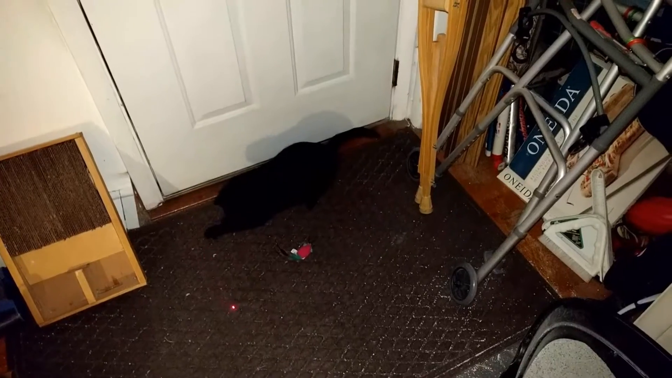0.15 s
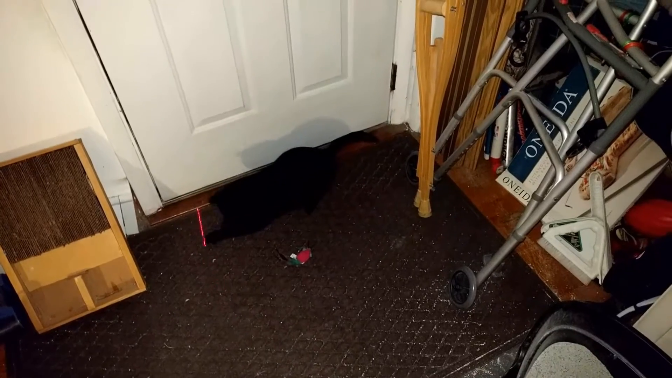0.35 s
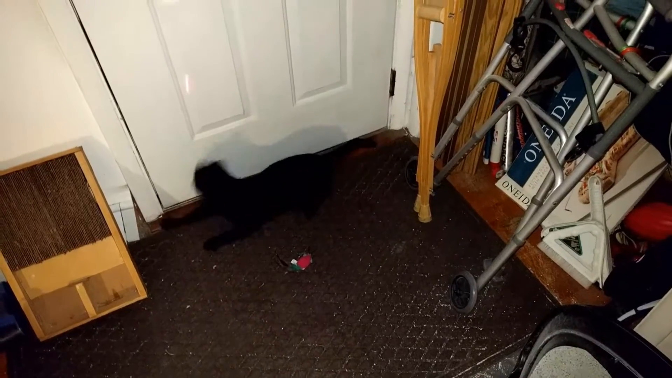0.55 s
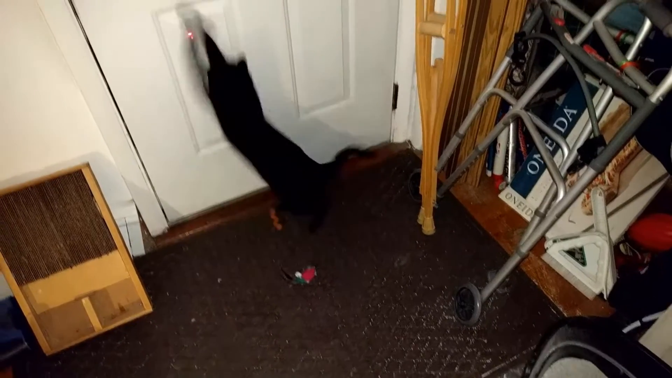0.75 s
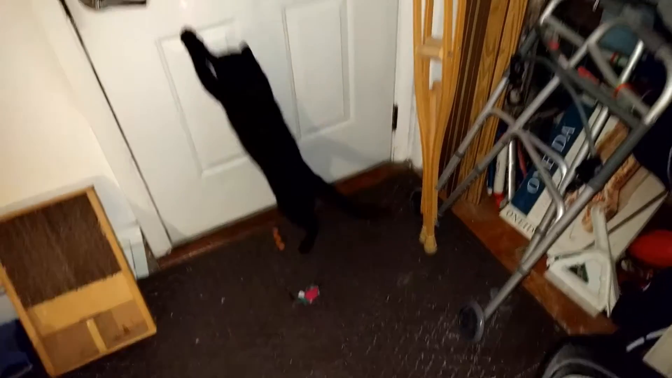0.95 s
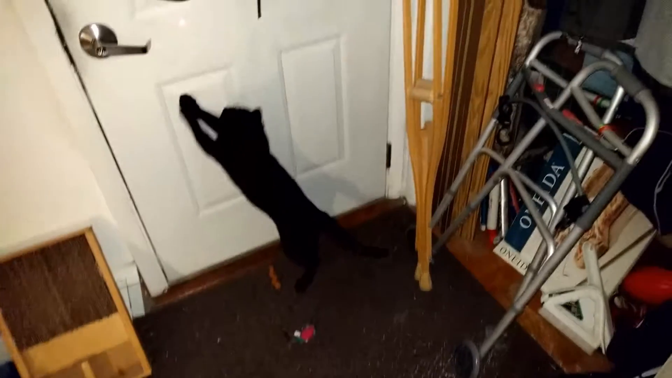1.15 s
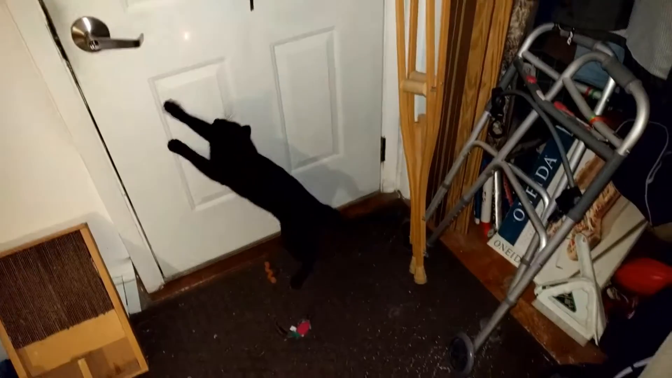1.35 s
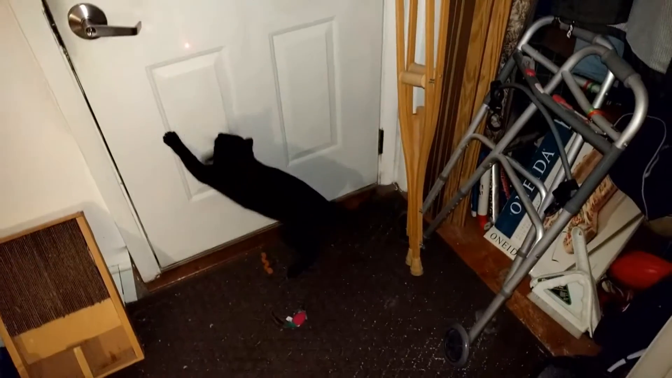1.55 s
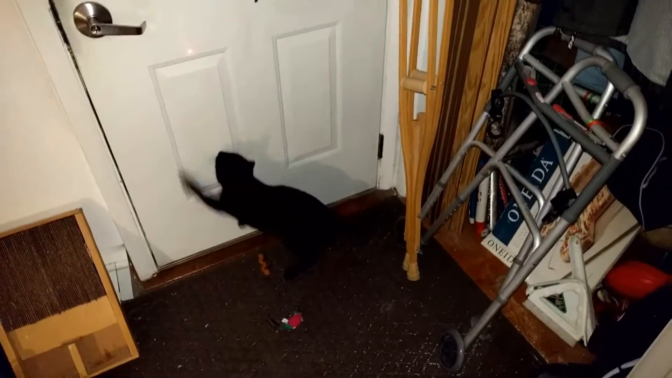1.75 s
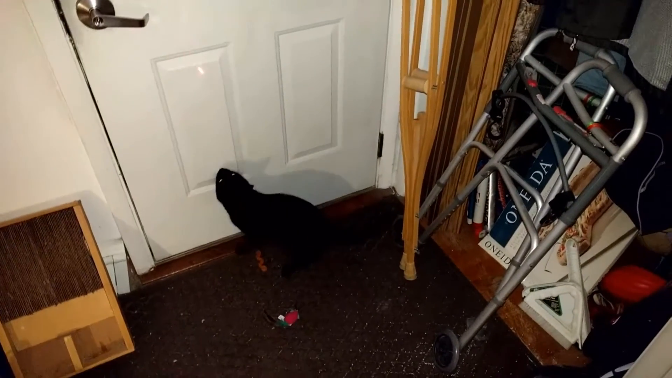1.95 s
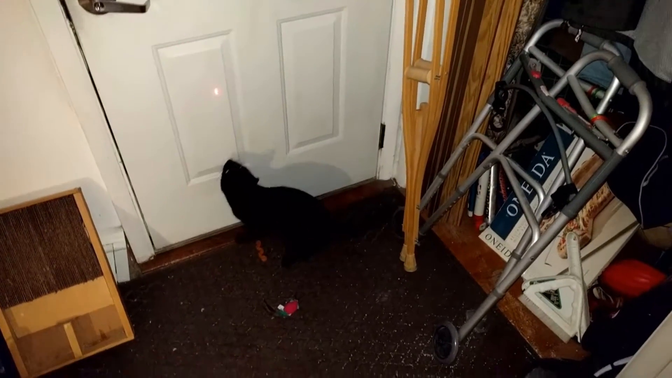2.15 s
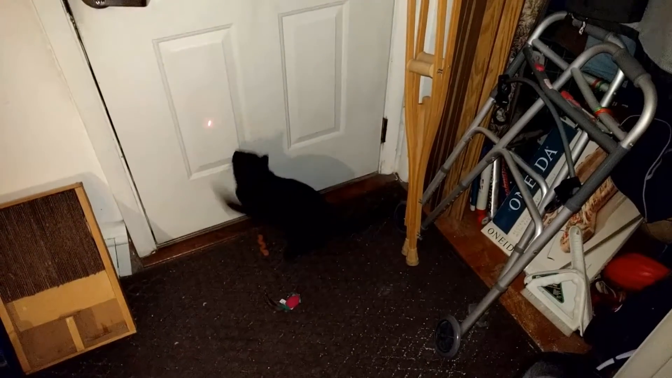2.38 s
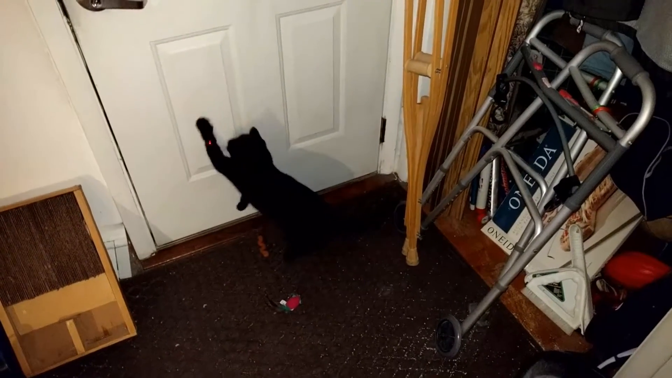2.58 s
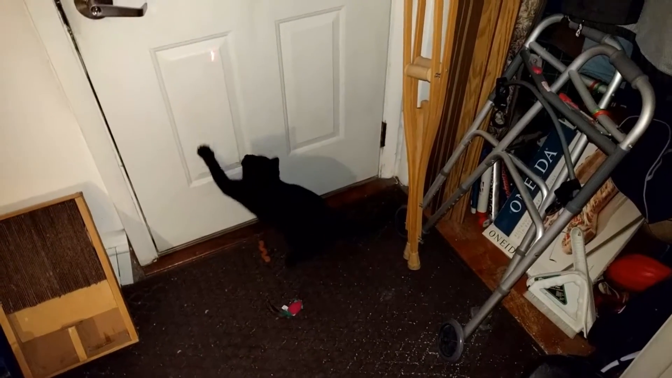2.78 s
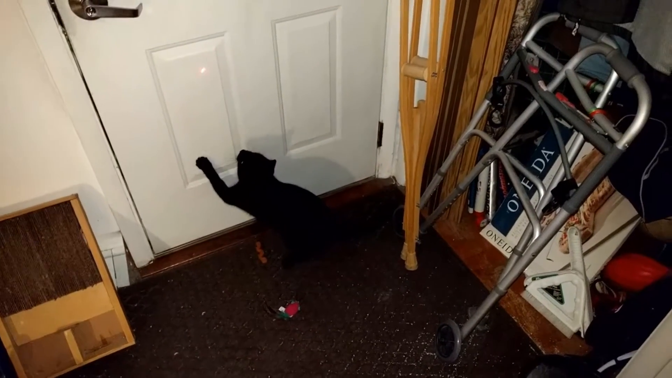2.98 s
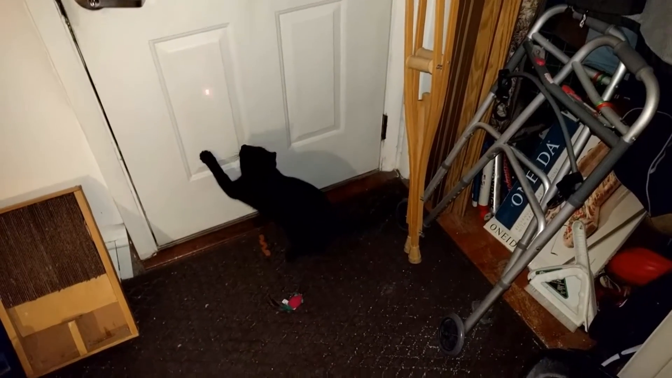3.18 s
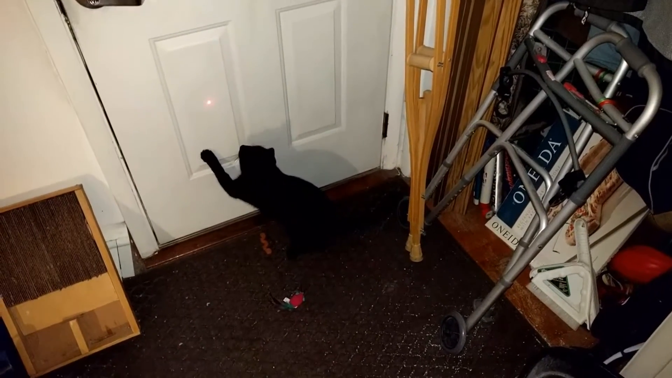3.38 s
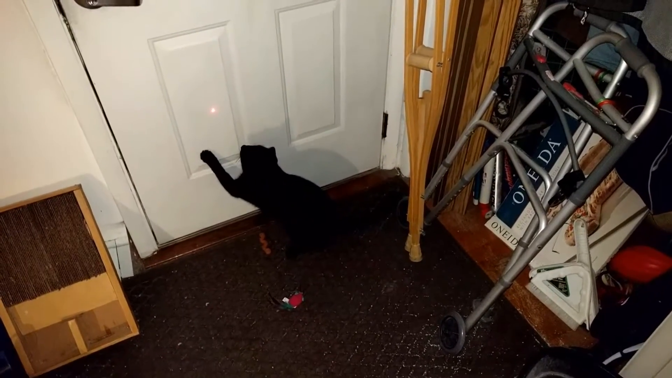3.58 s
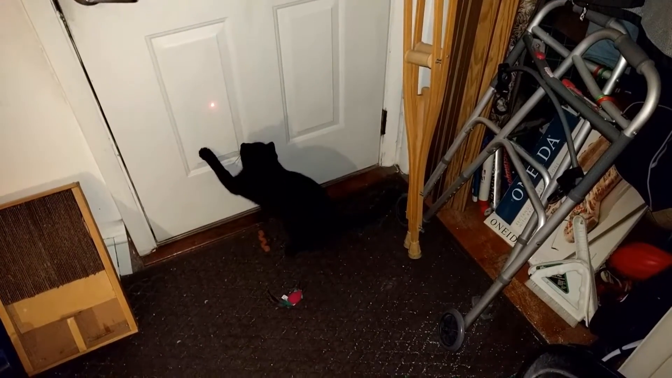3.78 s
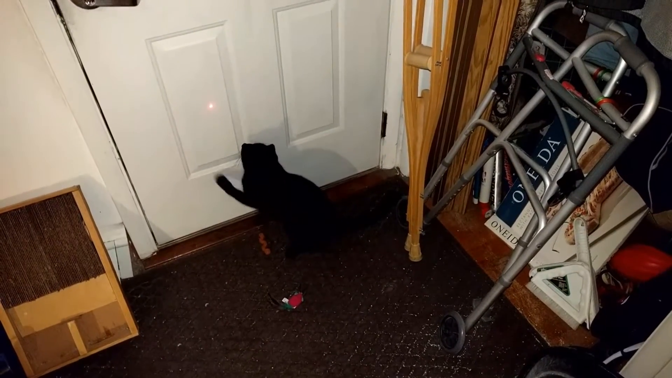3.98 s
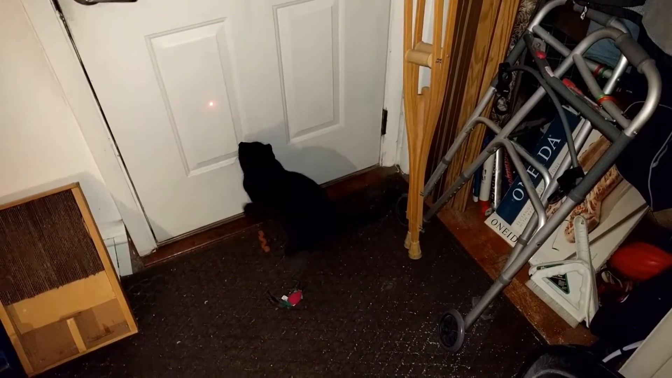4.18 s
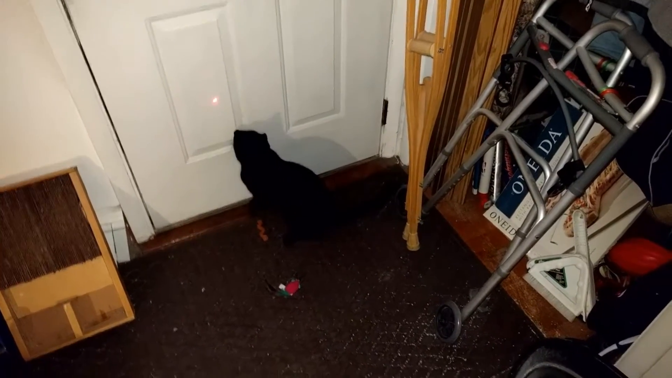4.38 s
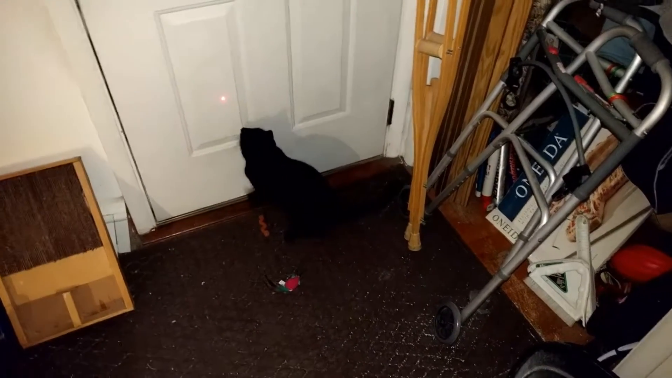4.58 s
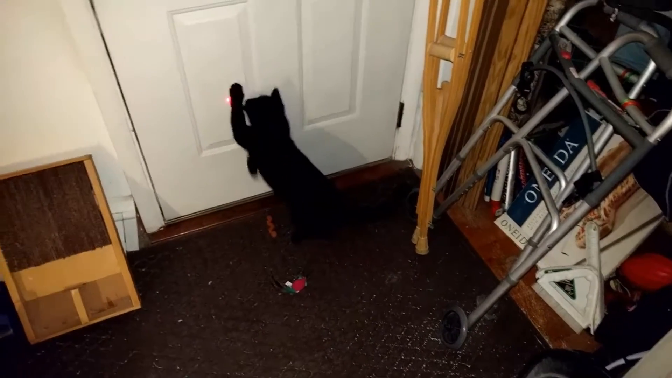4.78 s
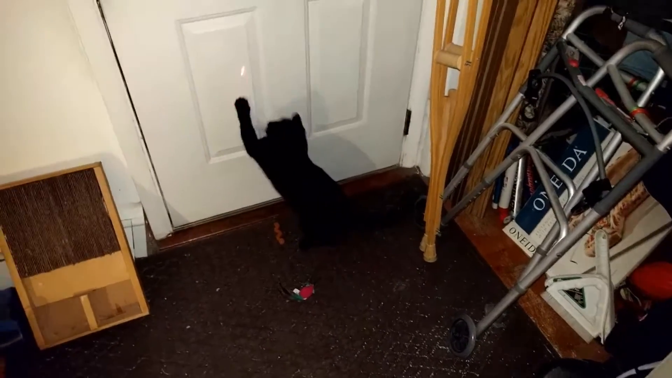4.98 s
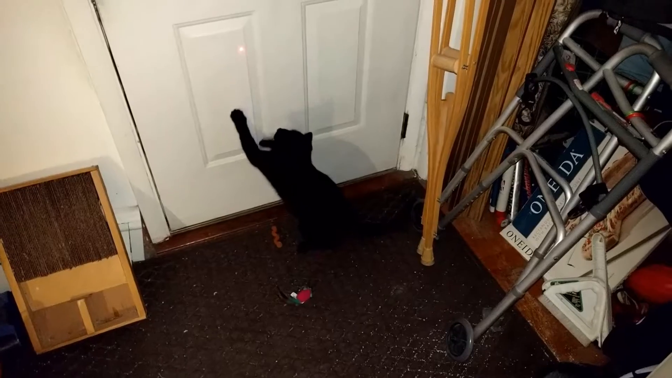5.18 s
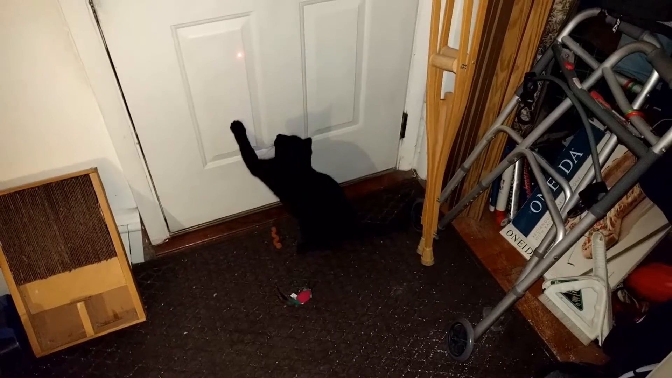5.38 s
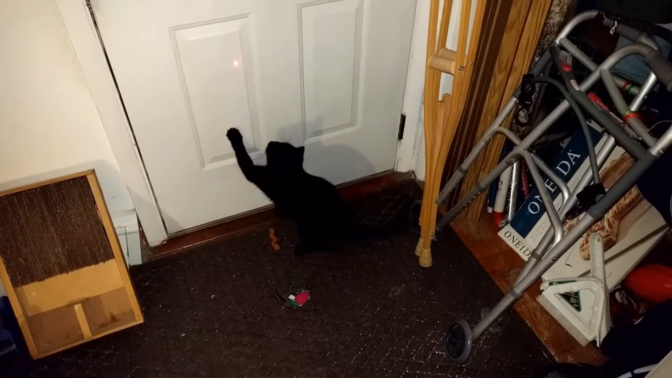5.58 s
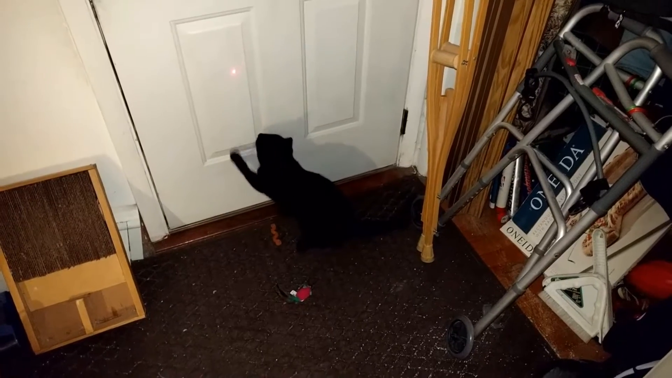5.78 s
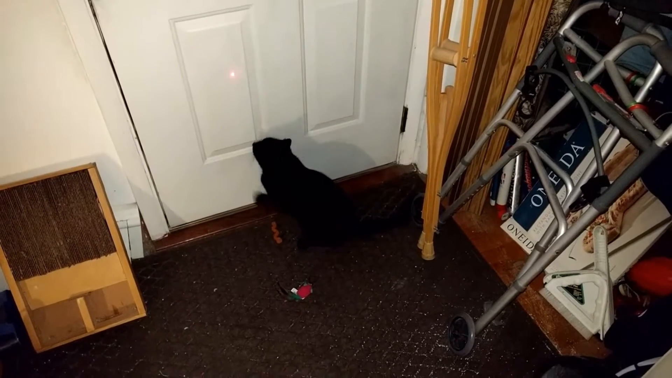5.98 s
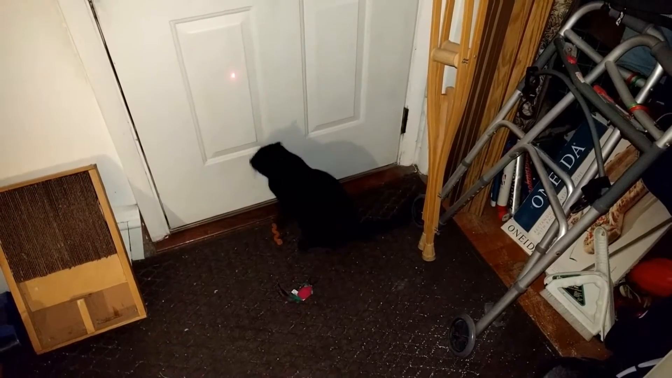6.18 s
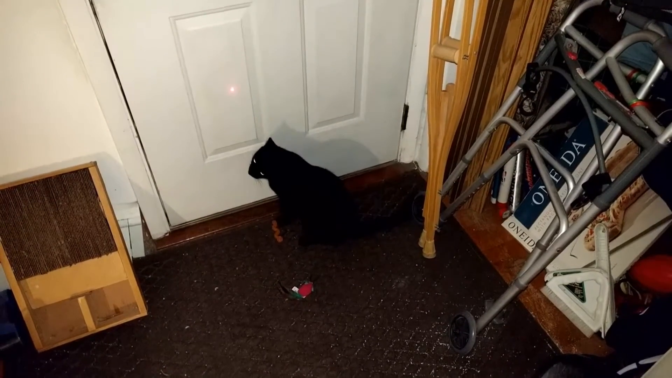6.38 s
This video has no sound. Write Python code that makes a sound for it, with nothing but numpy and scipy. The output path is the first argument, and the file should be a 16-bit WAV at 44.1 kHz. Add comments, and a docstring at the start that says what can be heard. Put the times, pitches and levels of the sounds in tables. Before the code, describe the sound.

A cat leaps and slaps a hollow door with clawed paws, scratching and squeaking down the paint, with soft footsteps between bursts in a quiet hallway.

```python
"""A cat pads softly about on a mat in a small cluttered hallway, over a faint rumble and hiss of the house.
It leaps at a hollow panelled door: paws slap it, filtered noise bursts and damped sines knock and boom.
The claws then slide down the paint, hissing and rasping as random clicks, squeaking as gliding harmonics.
More padding follows, as floor thuds and dull noise pats, then a last slap with its scratching, and steps."""
import sys
import numpy as np
from scipy import signal
from scipy.fft import rfft, irfft
from scipy.io import wavfile

SR = 44100
rng = np.random.default_rng(int(sys.argv[2]) if len(sys.argv) > 2 else 0)


def wav_out(sig):
    """Save sig, one row per channel (or a flat mono array), as 16-bit PCM at SR to the path in sys.argv[1]."""
    wavfile.write(sys.argv[1], SR, np.round(np.clip(np.atleast_2d(sig).T, -1, 1) * 32767).astype(np.int16))


N = 283869

# Paws hitting the door, levels ahead of the echoes: t/s, claw level/dB, door boom level/dB,
# panel knock level/dB, knock pitch f/Hz, frame clack level/dB, claw bite gain at 1.1-2.8 kHz/dB, landing time/s
SLAPS = [(0.602, -31.5, -65, -38.5, 190, -40.5, -5.5, 0.01), (0.93, -22, -36.5, -26.5, 180, -50, 4, 0.011),
         (1.477, -36, -50, -41, 225, -46, -4, 0.006), (2.023, -71, -66, -49.5, 177, -67, 11, 0.0047),
         (2.624, -23.5, -37, -38.5, 208.5, -33, 1.5, 0.013), (4.87, -22, -36.5, -34, 315, -37, 0.5, 0.015)]


def slaps(knock_s=0.014, knock_spread=1.25, ring_s=0.008, ring_db=-7, clack_s=0.0051):
    """Impact excitation: the pad knocks the panel, pitched by where it lands; the stiff frame clacks."""
    knocks, rings = np.zeros(N), np.zeros(N)
    t = np.arange(SR // 4) / SR
    frame = signal.butter(2, (374, 890), "band", fs=SR, output="sos")
    for s, claw_db, boom_db, knock_db, knock_hz, clack_db, bite_db, landing_s in SLAPS:
        panel_hz = [knock_hz / knock_spread, knock_hz * knock_spread]
        panel = signal.butter(2, panel_hz, "band", fs=SR, output="sos")
        for body, db, decay_s in (panel, knock_db, knock_s), (frame, clack_db, clack_s):
            force = rng.standard_normal(len(t)) * np.exp(-t / decay_s)
            blow = signal.sosfilt(body, force)
            add(knocks, s, from_db(db) * blow / np.abs(blow).max())
        ring = np.sin(2 * np.pi * knock_hz * t) * np.exp(-t / ring_s)
        add(rings, s, from_db(knock_db + ring_db) * ring)
    return claw_taps() + hallway(knocks, wet_db=-2.5) + rings


def claw_taps(first_touch=0.25, count=4, skid_s=0.0035):
    """Contact noise: several claws rattle as random clicks under a pressure pulse, each with its own echoes."""
    # Spectrum of the tapping claws: f/Hz, relative density/dB
    tap_spectrum = [(200, -31.5), (500, -23), (750, -18.5), (1020, -24), (1300, -12), (2200, -12),
                    (3000, -12), (4100, -10.5), (5500, -7), (6600, -0.5), (8000, -9), (11500, -20.5),
                    (13500, -32.5), (15500, -50)]
    claws = np.zeros((count, N))
    t = np.arange(SR // 8) / SR
    bite_band = signal.butter(1, [1100, 2800], "band", fs=SR, output="sos")
    for s, claw_db, boom_db, knock_db, knock_hz, clack_db, bite_db, landing_s in SLAPS:
        press = np.interp(t, [0, landing_s / 2], [first_touch, 1])
        coming_to_rest = np.exp(-np.maximum(t - landing_s, 0) / skid_s)
        pressure = press * coming_to_rest
        for claw in claws:
            rattle = catches(per_s=2500, spread_db=0.5, size=len(t)) * pressure / np.sqrt(count)
            bite = (from_db(bite_db) - 1) * signal.sosfilt(bite_band, rattle)
            add(claw, s, from_db(claw_db) * (rattle + bite))
    echoing = sum(hallway(claw, wet_db=-3.2) for claw in claws)
    return skin(through(echoing, response(tap_spectrum)))


def door_boom(push_s=0.007, second_paw_s=0.065, second_paw_db=-7):
    """Modal excitation: the weight behind a slap sets low modes going; a second paw leans in just after."""
    # Modes of the whole door swaying and of its panels: f/Hz, relative level/dB, t60/s
    door_modes = [(50, -9, 0.33), (62.6, 3.5, 0.45), (77.5, 3.5, .25), (128.8, 2.5, 0.38),
                  (158.6, -4, 0.22), (223, -13, 0.43), (245.5, -7, 0.28), (366.3, -15.5, 0.36)]
    out = np.zeros(N)
    t = np.arange(SR) / SR
    hz, mode_db, t60 = np.transpose(door_modes)[:, :, None]
    modes = from_db(mode_db - 60 * t / t60) * np.sin(2 * np.pi * hz * t)
    boom = np.sum(modes, axis=0) * (1 - np.exp(-t / push_s))
    for s, claw_db, boom_db, *rest in SLAPS:
        add(out, s, from_db(boom_db) * boom)
        add(out, s + second_paw_s, from_db(boom_db + second_paw_db) * boom)
    return out


def scrapes():
    """Sliding friction: claw tips hiss and rasp in the door skin; overlapping strokes add in power."""
    # Strokes of a paw: t of the hardest press/s, rise/s, fall/s, hiss level/dB, rasp relative to hiss/dB
    strokes = [(0.922, 0.017, 0.028, -40, -5.5), (0.995, 0.083, 0.19, -43, -5.5),
               (1.21, 0.27, 0.32, -47, -9), (1.46, 0.13, 0.05, -43.5, -11.5),
               (1.538, 0.096, 0.18, -44, -13), (1.818, 0.17, 0.083, -59, -10),
               (2.691, 0.088, 0.27, -35, -15.5), (2.875, 0.39, 0.31, -37.5, -12),
               (2.995, 0.29, 0.23, -38.5, -9.5), (3.34, 0.21, 0.15, -69, -11),
               (4.0, 0.2, 0.35, -71.5, -1.5), (4.15, 0.028, 0.1, -58.5, -5),
               (4.925, .04, 0.12, -37.5, -9.5), (5.139, 0.19, 0.22, -36.5, -5.5),
               (5.345, 0.15, 0.3, -42.5, -9), (5.5, 0.45, 0.62, -46, -2.5), (5.81, 0.24, .14, -48, -3.5),
               (5.862, 0.074, 0.073, -39.5, -24), (6.2, 0.26, 0.18, -63, -7)]
    # Spectra of the hiss and of the rasp ahead of the skin rings: f/Hz, relative density/dB
    hiss_spectrum = [(500, -51), (1500, -23.5), (2600, -9), (3600, -9.5), (4600, -4), (5600, -1.5),
                     (6400, 2), (7100, -1.5), (8000, -12), (10000, -20), (12000, -34.5), (15500, -62)]
    rasp_spectrum = [(300, -25), (900, -19), (1100, -17.5), (1280, -5.5), (1600, -6), (2100, -4),
                     (2700, -13), (3500, -14), (6000, -40), (12000, -60)]
    hiss_power, rasp_power = 0, 0
    for s, rise_s, fall_s, hiss_db, rasp_db in strokes:
        power = (from_db(hiss_db) * swell(s, rise_s, fall_s)) ** 2
        hiss_power = hiss_power + power
        rasp_power = rasp_power + power * from_db(rasp_db) ** 2
    fine_clicks = catches(per_s=9000, spread_db=2.5, size=N)
    coarse_clicks = catches(per_s=3000, spread_db=2.5, size=N)
    hiss = rms_one(through(fine_clicks, response(hiss_spectrum)))
    rasp = rms_one(skin(through(coarse_clicks, response(rasp_spectrum))))
    return np.sqrt(hiss_power) * hiss + np.sqrt(rasp_power) * rasp


def squeaks(flutter_db=1.5, hard_db=-38, soft_db=-50, lowest_hz=1200):
    """Stick-slip oscillation: a claw slips nearly regularly, its rate rising steadily as the paw speeds up."""
    # Chattering claws: t when loudest/s, rise/s, fall/s, fundamental level/dB,
    # slip rate when loudest f/Hz, glide/(Hz/s), unevenness as a share of the rate
    chatters = [(0.94, .012, 0.22, -42.5, 1310, 30, 0.011), (1.23, .3, 0.32, -56, 1310, 59.4, 0.013),
                (1.429, .1, .24, -52, 1480, 304, 0.131), (2.875, .14, 0.17, -38, 2130, 2800, .1),
                (2.99, .1, 0.2, -48.5, 2790, 800, 0.038), (5.135, .06, 0.11, -30.5, 1775, 1512, 0.0317),
                (5.15, .17, 0.22, -40, 1700, 506, .09), (5.385, .28, 0.18, -42, 2200, 1800, 0.099),
                (5.505, .06, 0.067, -42.5, 2530, 1440, 0.034)]
    out = np.zeros(N)
    for s, rise_s, fall_s, level_db, slips_hz, glide, uneven in chatters:
        gain = swell(s, rise_s, fall_s)
        touching = gain > 0
        steady_rate = slips_hz + glide * (np.flatnonzero(touching) / SR - s)
        rate = steady_rate * (1 + uneven * drift(304.5)[touching])
        phase = 2 * np.pi * np.cumsum(rate) / SR
        # only a hard-pressed claw slips sharply enough for overtones
        sharp = np.interp(level_db, [soft_db, hard_db], [0, 1])
        overtones = sum(from_db(db) * np.sin(k * phase) for k, db in enumerate([-7.0, -15, -17], 2))
        out[touching] += from_db(level_db) * gain[touching] * (np.sin(phase) + sharp * overtones)
    fluttering = out * from_db(flutter_db * drift(57))
    # the skin radiates little below its first ring
    radiated = signal.butter(6, lowest_hz, "high", fs=SR, output="sos")
    return signal.sosfilt(radiated, fluttering + 1e-18)  # tiny offset keeps the filter off denormals


def swell(s, rise_s, fall_s, power=2.03):
    """Pressure law: a paw presses evenly harder until time s, then eases; gain is a power of the pressure."""
    pressure = np.interp(np.arange(N) / SR, [s - rise_s, s, s + fall_s], [0, 1, 0])
    return pressure ** power


def catches(per_s, spread_db, size):
    """Random impulse train: a claw tip catches on grains of paint, in clicks of uneven size, unit rms."""
    sizes = from_db(spread_db * np.minimum(rng.exponential(1, size), 3))
    signed = sizes * rng.choice([-1, 1], size)
    return rms_one(signed * (rng.random(size) < per_s / SR))


def skin(x):
    """Resonance: the thin door skin adds a few rings to whatever touches it."""
    # Rings of the door skin under a claw: f/Hz, width/Hz, peak gain/dB
    skin_rings = [(1306, 17, 1.5), (1540, 200, -10.5), (3910, 400, -24.5)]
    out = x.copy()
    for hz, width_hz, db in skin_rings:
        r = np.exp(-np.pi * width_hz / SR)  # pole radius
        zeros = (1 - r * r) / 2 * np.array([1, 0, -1])
        poles = [1, -2 * r * np.cos(2 * np.pi * hz / SR), r * r]
        out += from_db(db) * signal.lfilter(zeros, poles, x)
    return out


def footfalls(floor_hz=62, floor_t60=0.028, floor_db=-7, pat_s=0.0058):
    """Damped impact: a soft paw pushes the floor, which rings briefly; a dull pat of noise is added."""
    # Soft steps: t/s, peak level of the push/dB, pat drive relative to the push/dB
    steps = [(0.021, -65, 15.5), (1.16, -39, -22), (1.215, -42.5, -16), (1.335, -45, -1),
             (1.55, -39.5, -10), (1.63, -38.5, -25), (1.709, -42, -15), (1.802, -46.5, -7),
             (1.858, -48, -4), (1.953, -45.5, -9), (2.02, -50, 2), (2.12, -53, -7), (3.911, -45, -6.5),
             (3.974, -36.5, -8.5), (4.041, -45.5, -16), (4.134, -42.5, -13), (4.311, -50, -6),
             (4.429, -48, -22), (4.466, -49.5, -24), (4.592, -41, -14), (6.197, -45.5, -7),
             (6.299, -45.5, -9)]
    # Spectra of the push on the mat and of the pat: f/Hz, relative density/dB
    thud_spectrum = [(18, -39), (35, -2.5), (55, 17.5), (75, 7), (100, 8), (150, -21.5), (300, -53),
                     (2000, -100)]
    pat_spectrum = [(50, -26), (110, 7.5), (170, -2), (280, -23.5), (500, -17.5), (1000, -26), (3000, -59),
                    (10000, -100)]
    thuds, pats = np.zeros(N), np.zeros(N)
    t = np.arange(SR // 4) / SR
    push = response(thud_spectrum)
    sway = np.sin(2 * np.pi * floor_hz * t) * from_db(floor_db - 60 * t / floor_t60)
    for s, db, bright_db in steps:
        add(thuds, s, from_db(db) * push / np.abs(push).max())
        add(thuds, s, from_db(db) * sway)
        pat = rng.standard_normal(len(t)) * np.exp(-t / pat_s)
        add(pats, s, from_db(db + bright_db) * pat)
    return thuds + hallway(through(pats, response(pat_spectrum)), wet_db=-6.5)


def room_air(level_db=-63):
    """Filtered noise: faint rumble and hiss of the house, steady but for a few brief dips in level."""
    # Spectrum of the room noise: f/Hz, relative density/dB
    air_spectrum = [(15, -34), (25, -8.5), (61, 5), (82, -1), (122, -2), (152, -6.5), (267, -7.5),
                    (349, -12), (482, -13.5), (1240, -22), (1490, -23), (3000, -27), (6380, -25),
                    (8580, -28), (15500, -32.5)]
    # Dips in level: t of the lowest point/s, length/s, depth/dB
    air_dips = [(0.229, 0.079, 11.5), (0.383, 0.2, 9.5), (2.253, 0.079, 11.5), (2.351, 0.053, 10.5),
                (3.541, 0.16, 18), (4.725, 0.11, 8.5)]
    t = np.arange(N) / SR
    dips_db = 0
    for s, length_s, depth_db in air_dips:
        dips_db = dips_db + depth_db * np.exp(-(2 * np.abs(t - s) / length_s) ** 3)
    return from_db(level_db - dips_db) * through(rng.standard_normal(N), response(air_spectrum))


def hallway(x, wet_db, first_echo_s=0.0026):
    """Reverberation: close walls give a dense tail of noise bands, each decaying at its own rate."""
    # Decay of the hallway: f/Hz, t60/s
    hall_t60 = [(100, 0.31), (500, 0.46), (1500, 0.3), (6000, 0.21), (9000, 0.39), (14000, 0.079)]
    t = np.arange(SR // 2) / SR
    edges = np.geomspace(40, 18000, num=10)
    tail = 0
    for low, high in zip(edges, edges[1:]):
        band_filter = signal.butter(2, [low, high], "band", fs=SR, output="sos")
        band = signal.sosfilt(band_filter, rng.standard_normal(len(t)))
        tail = tail + band * from_db(-60 * t / at_hz(hall_t60, np.sqrt(low * high)))
    impulse = from_db(wet_db) * unit_energy(tail * (t > first_echo_s))
    impulse[0] = 1  # direct sound
    return through(x, unit_energy(impulse))


def two_ports(x, spread_db, balance_db=0.2, size=4096):
    """Decorrelation: nearby reflections make the small difference between two close microphone ports."""
    # Difference of the ports, ahead of spread_db: f/Hz, side relative to mid/dB
    port_width = [(60, -19), (200, -22), (600, -15.5), (1300, -14.5), (5000, -16), (10000, -12.5)]
    hz = np.fft.rfftfreq(size, 1 / SR)
    difference = from_db(spread_db + at_hz(port_width, hz))
    for lag in rng.integers(SR // 1000, SR // 250, 4):  # all-pass echoes of 1-4 ms scramble the phase
        echo = np.exp(-2j * np.pi * hz * lag / SR)
        difference = difference * (.5 + echo) / (1 + .5 * echo)
    side = through(x, irfft(difference))
    return np.array([(x + side) * from_db(-balance_db), (x - side) * from_db(balance_db)])


def response(spectrum, size=8192):
    """Minimum phase: the folded cepstrum of a spectrum gives its causal impulse response, unit energy."""
    gain = from_db(at_hz(spectrum, np.fft.rfftfreq(size, 1 / SR)))
    cepstrum = irfft(np.log(gain))
    cepstrum[1:size // 2] *= 2
    cepstrum[size // 2 + 1:] = 0
    return unit_energy(irfft(np.exp(rfft(cepstrum))))


def drift(rate):
    """Low-passed noise: a random wander of spread 1, changing about rate times a second."""
    r = np.exp(-2 * np.pi * rate / SR)
    wander = signal.lfilter([1], [1, -2 * r, r * r], rng.standard_normal(N + SR))
    return rms_one(wander[SR:])  # the first second lets the filter settle


def at_hz(points, hz):
    """Logarithmic pitch axis: read a table by linear interpolation in log frequency."""
    f, value = np.transpose(points)
    return np.interp(np.log(np.maximum(hz, 1)), np.log(f), value)


def through(x, impulse):
    """Convolution: pass a sound through an impulse response."""
    return signal.oaconvolve(x, impulse)[:len(x)]


def add(track, s, sound):
    """Superposition: mix a sound into a track at time s."""
    i = max(round(s * SR), 0)
    track[i:i + len(sound)] += sound[:N - i]


def from_db(db):
    """Level law: decibels to amplitude gain."""
    return 10 ** (np.asarray(db) / 20)


def rms_one(x):
    """Normalisation: scale to unit rms."""
    return x / np.sqrt(np.mean(x ** 2) + 1e-20)


def unit_energy(x):
    """Energy conservation: scale a response so that it passes white noise at equal power."""
    return x / np.sqrt(np.sum(x ** 2) + 1e-20)


def scene():
    """Superposition of cat, door and hallway; the boom, the footfalls and the faint air sit in the middle."""
    striking = two_ports(slaps(), spread_db=-3.0)
    sliding = two_ports(hallway(scrapes() + squeaks(), wet_db=-8.5), spread_db=-23.0)
    return striking + sliding + door_boom() + footfalls() + room_air()


def record(dry, cutoff_hz=15700):
    """Band limiting: an elliptic low-pass cuts the top steeply."""
    return signal.sosfilt(signal.ellip(10, .1, 80, cutoff_hz, fs=SR, output="sos"), dry)


dry = scene()
out = record(dry)
wav_out(out)
```